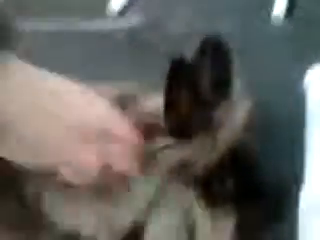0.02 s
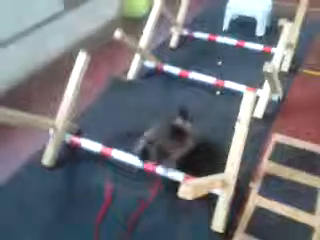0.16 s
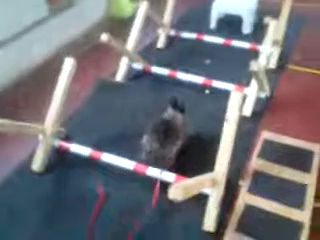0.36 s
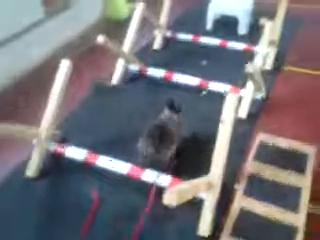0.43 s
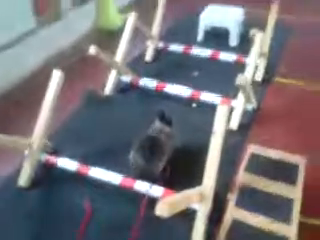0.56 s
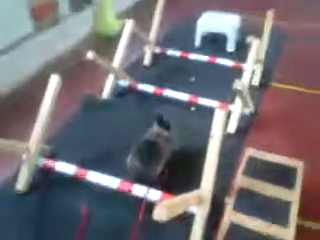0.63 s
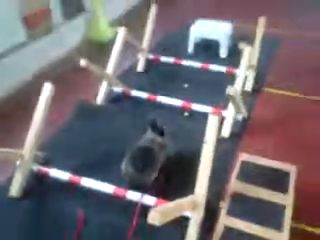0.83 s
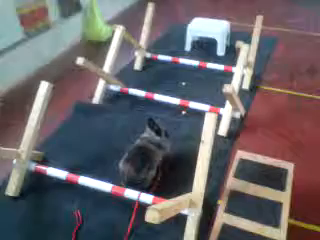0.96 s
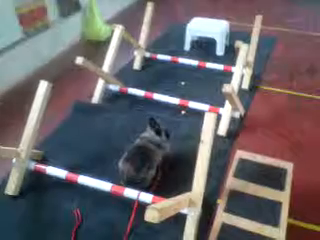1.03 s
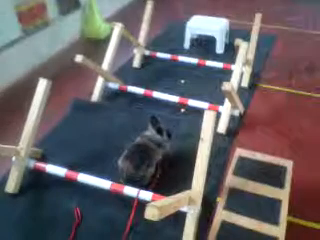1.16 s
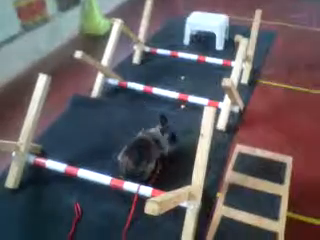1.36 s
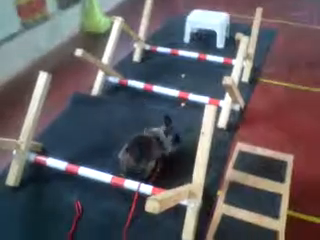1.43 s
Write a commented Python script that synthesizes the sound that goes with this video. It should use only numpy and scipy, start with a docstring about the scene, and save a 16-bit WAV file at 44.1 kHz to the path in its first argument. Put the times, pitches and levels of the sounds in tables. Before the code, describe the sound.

Fingers bump a microphone's casing, and a sharp clack rings out in a sports hall.

```python
"""Fingers knock and tap on the casing of a hand-held camera, close and dry.
Each knock rings the casing briefly, the fingers slip with tiny ticks, and a dull thump follows.
Right after, a hard clack rings out through a large sports hall: the struck object rings on in
wavering tones while the echo dies away. Under it all lie the hall's air hiss and a low, wavering hum."""
import sys
import numpy as np
from scipy import signal
from scipy.fft import rfft, irfft, next_fast_len
from scipy.io import wavfile
from scipy.ndimage import map_coordinates

SR = 44100
rng = np.random.default_rng(int(sys.argv[2]) if len(sys.argv) > 2 else 0)


def generate_wav(signal):
    """Clip the signal to [-1, 1] and save it as 16-bit WAV at the path in sys.argv[1]."""
    frames = np.transpose(np.atleast_2d(signal))
    scaled = np.clip(frames, -1, 1) * 32767
    pcm = np.round(scaled).astype(np.int16)
    wavfile.write(sys.argv[1], SR, pcm)


N = 66150

# Tone colour of the air hiss: f/Hz, relative level/dB
AIR_COLOUR = [(25, -25.5), (45, -14.5), (100, -12.5), (140, -13), (250, -15), (400, -17.5), (700, -21),
              (1500, -23), (3000, -29), (4200, -34.5), (5200, -39), (8000, -50)]
# Narrow bands of the hall's drone: f/Hz, width/Hz, level/dB
DRONE_BANDS = [(187.8, 5.5, -76.5), (287.6, 6.4, -79.5), (576, 5.1, -82)]
# Pitch of the low hum: t/s, f/Hz
HUM_PITCH = [(0, 60), (.4, 60), (.7, 65), (1.15, 64), (1.5, 59.5)]
# Swells of the low hum: t/s, level/dB
HUM_LEVEL = [(0, -72), (.4, -72), (.52, -73), (.6, -64), (.668, -80), (.73, -62), (.792, -80), (.86, -62),
             (.935, -80), (1.02, -61), (1.098, -80), (1.17, -61), (1.27, -82), (1.36, -66), (1.5, -74)]
# Tone colour of the clack in the hall: f/Hz, relative level/dB
CLACK_COLOUR = [(100, -10.5), (400, -13.5), (750, -4), (1050, 2.5), (1700, 1), (2050, -6), (2550, -1.5),
                (3000, -6), (3900, -9), (4700, -20.5), (6000, -27.5), (8000, -53.5)]
# How long the hall echoes (t60 is the time to fade by 60 dB): f/Hz, t60/s
HALL_T60 = [(200, 1), (1000, 0.43), (2000, 0.83), (4000, 0.86), (8000, 0.71)]
# Ringing tones of the struck object: f/Hz, relative level/dB, t60/s
RING_TONES = [(975, -55, .5), (1072, -47.5, .55), (1230, -57, .55), (1420, -54, .4), (1510, -49, .27),
              (1612, -49, .42), (1650, -50, .5), (1790, -47.5, .58), (2153, -59, .6), (2300, -47, .68),
              (2444, -53, .33), (2620, -52, .4), (3122, -57, .5), (3705, -55, .48)]
# Three quick, dull pops: t/s, strength/dB, rise/s, decay/s
DULL_POPS = [(.2825, -14, .00009, .00055), (.2851, -20, .00014, .001), (.2872, -13, .0014, .0015)]
# Scratchy ticks of the grip: t/s, level/dB, centre f/Hz, t60/s
GRIP_TICKS = [(0.2457, -39, 2460, 0.011), (.2505, -38.5, 3710, 0.0093), (0.2791, -47, 2710, 0.047)]
# Tone colour shared by the ticks: f/Hz, relative level/dB
TICK_COLOUR = [(100, -13), (800, -16), (1600, 13), (3000, 0.5), (4200, 0.5), (5300, -12.5), (6400, -10.5),
               (8000, -34.5)]
# Pitches at which the casing rings: f/Hz, half width/Hz, relative level/dB
CASING_RESONANCES = [(392, 263, -10), (828, 184, -2.5), (1194, 166, -2.5), (1846, 285, 1), (3008, 464, 1.5),
                     (4180, 334, -10), (5150, 240, -23), (6460, 600, -32.5)]
# Knocks on the casing (a soft one has a low upper edge): t/s, strength/dB, upper edge f/Hz
KNOCKS = [(0.137, -25.5, 1440), (0.2082, 8.5, 6600), (0.2422, 3, 1170), (0.2574, 5, 680), (0.2647, 6, 640)]


def amp(db):
    """Turn decibels into a factor to multiply by."""
    return 10 ** (np.asarray(db) / 20)


def unit(x):
    """Scale a sound to an average strength (rms) of 1."""
    return x / np.sqrt(np.mean(x ** 2) + 1e-20)


def along(points, hz):
    """Read between (f/Hz, value) points on a logarithmic frequency axis."""
    f, values = np.transpose(points)
    return np.interp(np.log(hz + 1), np.log(f + 1), values)


def curve(rows):
    """Join (t/s, value) points with straight lines, one value a sample."""
    return np.interp(np.arange(N) / SR, *np.transpose(rows))


def since(start):
    """Seconds since start, zero before it."""
    return np.maximum(np.arange(N) / SR - start, 0)


def wobble(rate):
    """A smooth curve through rate random values a second."""
    return map_coordinates(rng.standard_normal(400), [np.arange(N) * rate / SR], mode="wrap")


def filtered(x, response):
    """Scale and delay each frequency f in x as response(f) says."""
    size = next_fast_len(N + SR // 2)
    return irfft(rfft(x, size) * response(np.fft.rfftfreq(size, 1 / SR)), size)[:N]


def resonance(f, hz, width):
    """A filter response that favours the frequencies near hz."""
    return 1j * f * width / (hz * hz - f * f + 1j * f * width)


def causal(gain):
    """The fastest-starting filter response with this gain at each frequency."""
    cepstrum = irfft(np.log(np.maximum(gain, 1e-6)))
    half = len(cepstrum) // 2
    cepstrum[1:half] *= 2
    cepstrum[half + 1:] = 0  # nothing sounds before the hit
    return np.exp(rfft(cepstrum))


def noise(colour):
    """Noise of strength 1 with the given tone colour."""
    return unit(filtered(rng.standard_normal(N), lambda f: amp(along(colour, f))))


def hall_air(hiss_db=-69):
    """Steady hiss, a faint drone and a low hum that swells and sinks."""
    drone = np.zeros(N)
    for hz, width, db in DRONE_BANDS:
        band = filtered(rng.standard_normal(N), lambda f: resonance(f, hz, width))
        drone += amp(db) * unit(band)
    swell = curve([(s, amp(db)) for s, db in HUM_LEVEL])
    phase = 2 * np.pi * np.cumsum(curve(HUM_PITCH)) / SR
    hum = swell * np.sqrt(2) * np.sin(phase)
    return amp(hiss_db) * noise(AIR_COLOUR) + drone + hum


def wavering_tone(hz, scattered_share=0.6, flutters_per_s=55):
    """A tone that flutters as its reflections in the hall mingle."""
    scatter = (wobble(flutters_per_s) + 1j * wobble(flutters_per_s)) / np.sqrt(2)
    tone = np.exp(2j * np.pi * (hz * since(0) + rng.random()))
    return np.real(tone * (np.sqrt(1 - scattered_share) + np.sqrt(scattered_share) * scatter))


def hall_clack(start_s=0.2865, attack_s=0.00032, early_t60=0.066):
    """A hard hit: a burst of early reflections, the hall's long echo and the object's ring."""
    early_db, echo_db, ring_db = -34, -45.5, -1.5
    t = since(start_s)
    early = amp(early_db - 60 * t / early_t60) * noise(CLACK_COLOUR)
    # Split noise into frequency bands, so each can fade at its own speed.
    f, times, bands = signal.stft(noise(CLACK_COLOUR), SR, nperseg=256)
    fade = amp(-60 * np.maximum(times - start_s, 0) / along(HALL_T60, f)[:, None])
    echo = amp(echo_db) * signal.istft(bands * fade, SR, nperseg=256)[1][:N]
    ring = sum(amp(ring_db + db - 60 * t / t60) * wavering_tone(hz) for hz, db, t60 in RING_TONES)
    return (1 - np.exp(-t / attack_s)) * (early + echo + ring)


def dull_thump():
    """Three quick, dull pops that merge into one thump."""
    out = np.zeros(N)
    for k, (start, db, rise, decay) in enumerate(DULL_POPS):
        t = since(start)
        sign = 1 if k else -1  # the first pulse is negative, the others positive
        out += sign * amp(db) * (1 - np.exp(-t / rise)) * np.exp(-t / decay)
    return out


def grip_ticks(width_share=0.55):
    """Tiny slips of the fingers make very short bursts of noise."""
    out = np.zeros(N)
    for start, db, hz, t60 in GRIP_TICKS:
        t = since(start)
        burst = (t > 0) * amp(db - 60 * t / t60) * rng.standard_normal(N)
        colour = lambda f: causal(amp(along(TICK_COLOUR, f))) * resonance(f, hz, width_share * hz)
        filter_gain = np.linalg.norm(filtered(signal.unit_impulse(N), colour))
        out += filtered(burst, colour) / filter_gain
    return out


def casing_knocks():
    """Each knock rings the casing for a millisecond or two; each has its own brightness, set by its upper edge."""
    def response(f):
        soften = lambda ratio: 1 / (1 + 1j * np.sqrt(2) * ratio - ratio * ratio)  # dulls the treble
        delay = lambda seconds: np.exp(-2j * np.pi * f * seconds)
        knocks = sum(amp(db) * delay(start) * soften(f / edge) for start, db, edge in KNOCKS)
        casing = sum(amp(db) * np.exp(-((f - hz) / width) ** 2) for hz, width, db in CASING_RESONANCES)
        return knocks * causal(casing)
    return filtered(signal.unit_impulse(N), response)


def scene():
    """Add up all the sounds at one microphone."""
    return (casing_knocks() + grip_ticks() + dull_thump() + hall_clack() + hall_air())[None]


def record(dry):
    """The camera cuts off the highest treble."""
    top_hz, fade_hz = 8450, 600
    return filtered(dry[0], lambda f: np.clip((top_hz - f) / fade_hz, 0, 1))[None]


dry = scene()
out = record(dry)
generate_wav(out)
```